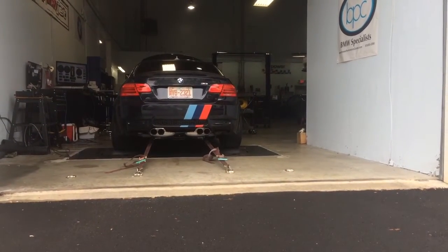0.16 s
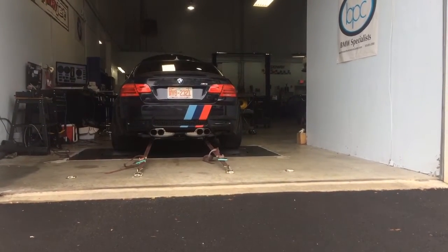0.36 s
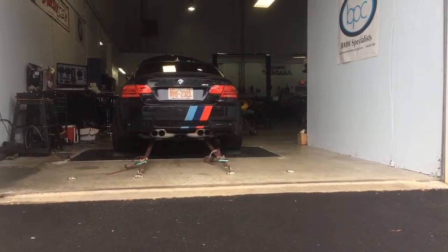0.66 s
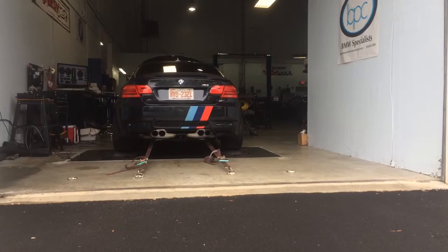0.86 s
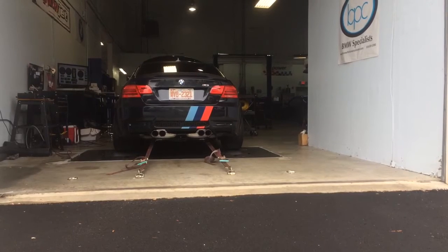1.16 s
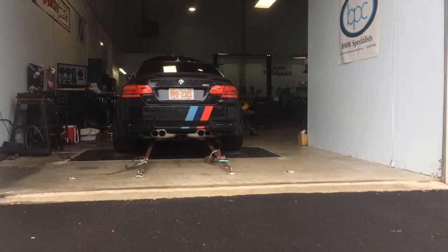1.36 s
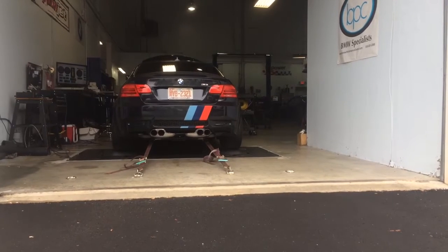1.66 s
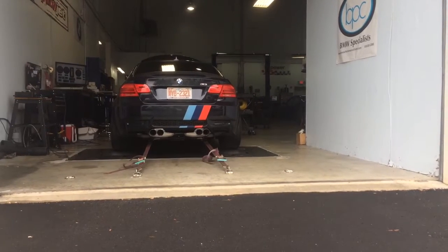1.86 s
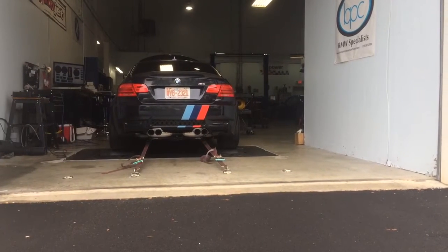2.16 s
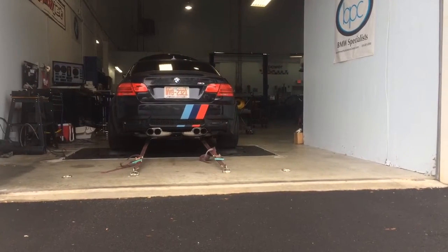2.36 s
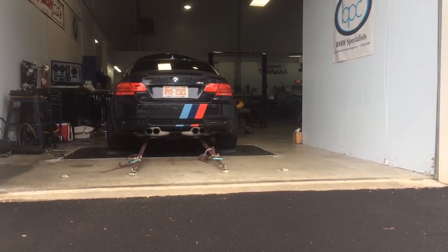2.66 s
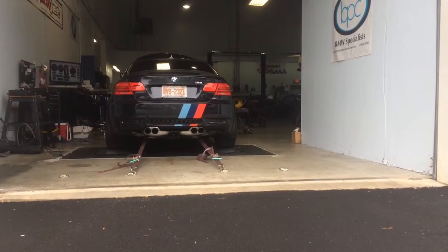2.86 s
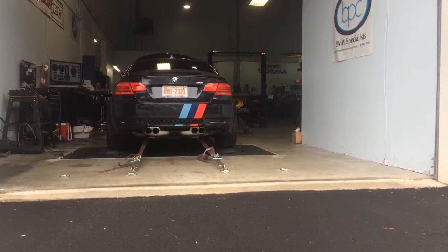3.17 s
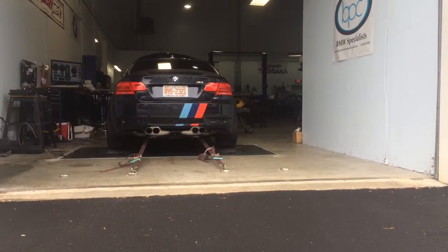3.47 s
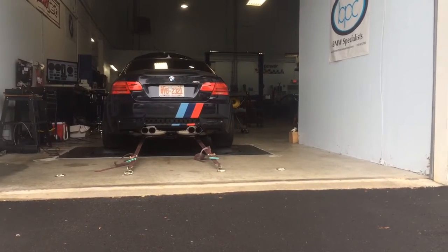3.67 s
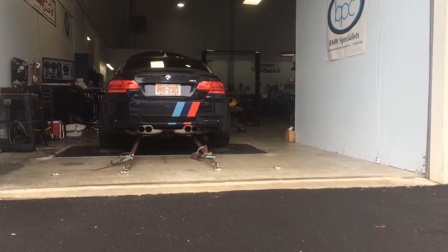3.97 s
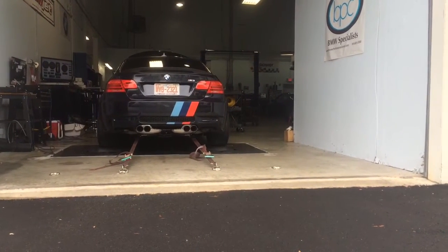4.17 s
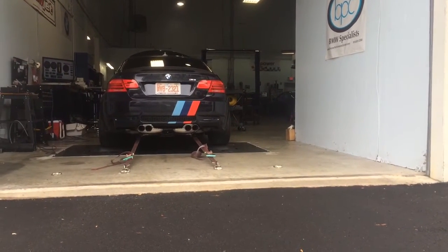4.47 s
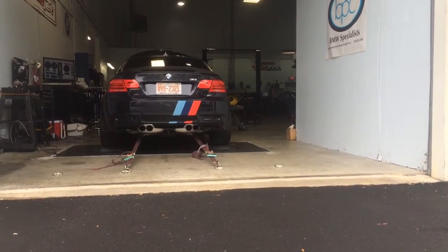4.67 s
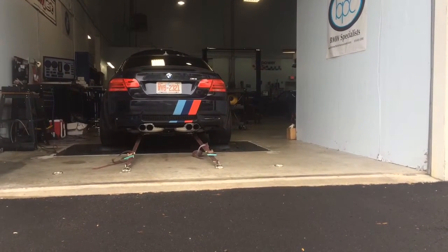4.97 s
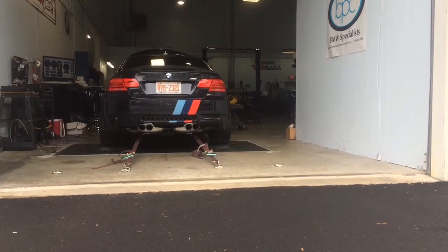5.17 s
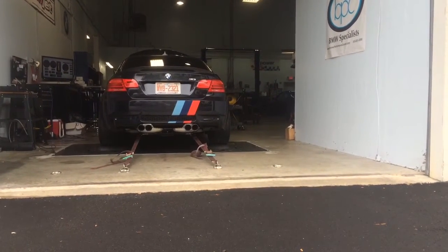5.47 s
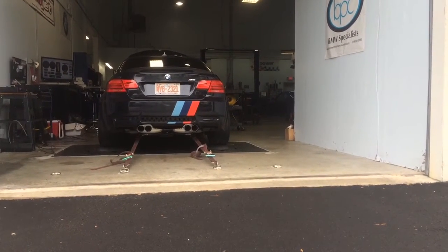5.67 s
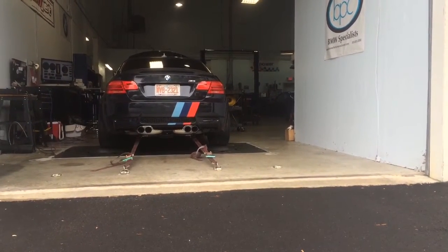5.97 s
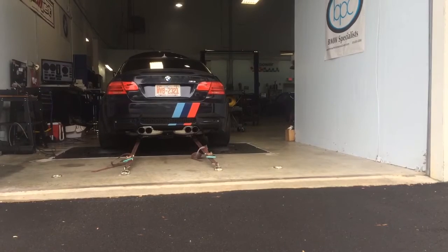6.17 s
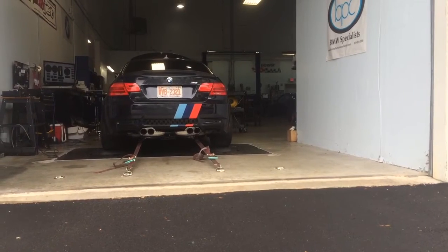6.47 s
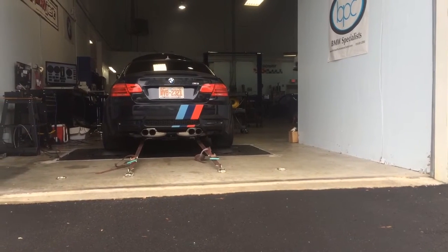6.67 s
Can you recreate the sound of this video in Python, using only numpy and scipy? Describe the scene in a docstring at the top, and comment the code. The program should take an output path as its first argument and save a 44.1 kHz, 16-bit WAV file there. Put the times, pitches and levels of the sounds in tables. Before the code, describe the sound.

A single microphone faces the exhaust at a garage doorway. The V8 barks briefly, lifts off and coasts in gear with a smooth falling hum, while shrill roller whines, broad tyre and fan hiss and low rumble dominate. After a short lull at five seconds the engine opens fully, its deep boom and coarse bark suddenly swamping everything, rising steadily in pitch until cut off, with short workshop reflections.

```python
"""An exhaust booms and barks at part throttle for a third of a second, then the throttle shuts.
A V8 car strapped to a roller dynamometer in an open workshop coasts down in gear, then takes full throttle.
Crank orders make the boom; uneven firing pulses and gas noise ring the pipes for the bark.
Two beating roller whines, tread bands and tyre hums ride over a hiss of tyres and fans and a low rumble.
The roller sounds and hiss sink at 5.21 s, as the exhaust gets loud."""
import sys
import numpy as np
from scipy import signal
from scipy.fft import rfft, irfft, next_fast_len
from scipy.io import wavfile
from scipy.ndimage import uniform_filter1d, map_coordinates

SR = 44100
rng = np.random.default_rng(int(sys.argv[2]) if len(sys.argv) > 2 else 0)


def file_out(sig):
    """Save sig as 16-bit WAV at sys.argv[1]."""
    # one column per channel
    cols = np.atleast_2d(sig).T
    # limit, then scale
    lim = np.clip(cols, -1, 1)
    pcm = np.round(lim * 32767).astype(np.int16)
    wavfile.write(sys.argv[1], SR, pcm)


N = 300762

# Boom levels. Each row: time in seconds, firing boom in dB, three-per-turn boom in dB before its wobble.
BOOM_LEVELS = [(0, -19, -32), (.2, -17.5, -23), (.36, -22.5, -28), (.43, -21.5, -16), (.52, -15.5, -18),
               (1.37, -15.5, -22), (2.27, -16, -23.5), (2.45, -14.5, -22.5), (3.5, -17.5, -20.5),
               (4.25, -16, -21.5), (4.7, -17.5, -21.5), (4.95, -27, -23.5), (5.05, -20, -21.5),
               (5.19, -8.5, -23.5), (5.26, -11, -22), (5.33, -11.5, -40), (5.4, -10.5, -37),
               (5.5, -12, -46), (5.61, -10, -38), (5.68, -13.5, -23), (5.76, -9.6, -38), (5.96, -8, -30),
               (6.38, -8.4, -27), (6.52, -9.5, -34), (6.82, -10.5, -25)]
# Colour the pipes give the twice-firing boom. Each row: frequency in Hz, gain in dB.
DOUBLE_FIRING_COLOUR = [(235, 4.5), (253, 5), (268, -1.5), (296, -7), (312, 2.5), (335, -14)]
# Weak crank orders. Each row: cycles per crank turn, level in dB before the standing waves, fading 0-1.
WEAK_ORDERS = [(1.5, -49, 0.6), (2, -38.5, 1), (2.5, -38.5, 1), (3.5, -38, 0.9), (4.5, -42.5, 1),
               (5, -34.5, 0), (5.5, -42.5, 0.53), (6, -36.5, 0.03), (6.5, -36, 0), (7, -30, 0.31)]
# Standing waves that lift and cancel the weak orders. Each row: frequency in Hz, gain in dB.
STANDING_WAVES = [(40, -1.5), (146, 3), (158, -3), (172, -1.5), (190, 0), (208, -3), (224, -9.5),
                  (260, -32)]


def boom(turns):
    """The low crank orders leave the silencers as nearly pure tones locked to the crank."""
    speed = crank_speed()
    firing_db, third_db = curves(BOOM_LEVELS)
    third_db = third_db + 1.2 * wobble(5)
    double_db = by_load(shut_db=-50, open_db=-31.5, per_turn_db=0.01)
    double_db = double_db + along(DOUBLE_FIRING_COLOUR, 8 * speed)

    tones = amp(firing_db) * narrow(4 * turns, fading=0.004, rate=14)
    tones += amp(third_db) * narrow(3 * turns, fading=0.008, rate=9)
    tones += amp(double_db) * narrow(8 * turns + 0.28, fading=0.065, rate=8.2)
    for order, db, fading in WEAK_ORDERS:
        order_db = db + along(STANDING_WAVES, order * speed)
        tones += amp(order_db) * narrow(order * turns + rng.random(), fading, rate=6)
    return tones


# Pulse strength in firing sequence. Each entry: level in dB at unevenness 1.
CYLINDER_DB = [0, -1, 0, -6, -.5, -1.5, 0, -4.5]
# Pulse lead on the boom. Each row: crank turns per second, lead in firings.
PULSE_LEAD = [(35, -.03), (40, .1)]


def firing_pulses(firing):
    """Each firing gives one pulse whose strength varies by cylinder and by chance."""
    uneven = throttle_and_unevenness()[1]
    at = np.flatnonzero(np.diff(np.floor(firing)) > 0)
    chance = rng.standard_normal((len(at), 2))
    jitter_s = 0.00013 * chance[:, 0]
    jitter = np.round(jitter_s * SR).astype(int)
    strength_db = uneven[at] * np.resize(CYLINDER_DB, len(at)) + 1.9 * chance[:, 1]
    pulses = np.zeros(N)
    pulses[np.clip(at + jitter, 0, N - 1)] = amp(strength_db)
    return pulses


# Tip resonances. Each row: frequency in Hz, width in Hz, relative level in dB.
TIP_MODES = [(900, 65, 9), (1320, 220, 2), (1605, 230, 0), (1960, 850, -10.5)]


def tip_rasp(pulses, firing):
    """Pulses and the turbulence that follows each firing ring the exhaust tips."""
    puff = 0.098 + np.exp(-6 * (firing % 1))
    turbulence = puff * rng.standard_normal(N)
    return 0.58 * steady(resonant(pulses, TIP_MODES)) + 0.57 * steady(resonant(turbulence, TIP_MODES))


# Gas rush levels. Each row: time in seconds, silencers in dB, tail pipes in dB.
RUSH_LEVELS = [(0, -32, -34), (.6, -36, -34), (2, -37.5, -38.5), (3, -35, -44), (4.8, -34.5, -47),
               (5.2, -32, -46), (5.7, -31, -37), (6.1, -40.5, -37), (6.82, -30.5, -26.5)]
# Silencer resonances. Each row: frequency in Hz, width in Hz, relative level in dB.
SILENCER_MODES = [(286.5, 35, 1), (378.3, 25.8, 3), (469, 112, -1.5)]
# Tail pipe resonances. Each row: frequency in Hz, width in Hz, relative level in dB.
TAIL_PIPE_MODES = [(568.5, 45, -0.5), (624.5, 54, 2), (985, 63, -5), (1511, 35, -10.5)]


def gas_rush(turns):
    """Flow noise, swelling and pumped once a turn, rings the silencers and tail pipes."""
    silencer_db, tail_db = curves(RUSH_LEVELS)
    pumping = np.diff(np.floor(turns), prepend=0) * amp(0.57 * wobble(18))
    throb = 1 + 0.07 * np.cos(2 * np.pi * turns)
    flow = throb * rng.standard_normal((2, N)) + 0.5 * unit(pumping)
    silencers = amp(silencer_db) * unit(resonant(flow[0], SILENCER_MODES))
    tails = amp(tail_db) * unit(resonant(flow[1], TAIL_PIPE_MODES))
    return silencers + tails


# Exhaust pipe resonances. Each row: frequency in Hz, width in Hz, relative level in dB.
PIPE_MODES = [(379, 28, -2), (517, 90, -3), (619.6, 60, 2), (808, 100, -8), (970, 270, -21)]
# Pipe tuning at wide throttle. Each row: crank turns per second, gain in dB.
WIDE_OPEN_TUNING = [(30, -1), (31.6, 2.5), (33, 1), (37.5, -0.5), (39.5, 2.5), (41.7, 6)]
# Rasp at wide throttle. Each row: crank turns per second, level in dB.
WIDE_OPEN_RASP = [(31, -60), (32.5, -45), (33.4, -36.5), (35, -31.5), (38, -29), (41.7, -27)]
RASP_SHUT_DB, SHOP_DB = -46.5, -15


def bark(turns):
    """Four firings a turn ring pipes and tips, echo in the workshop and drive a gas rush."""
    speed = crank_speed()
    wide = np.clip(throttle_and_unevenness()[0], 0, 1) ** 4
    burn_db = by_load(shut_db=-48, open_db=-22, per_turn_db=0.045)
    burn_db = burn_db + wide * np.interp(speed, *np.transpose(WIDE_OPEN_TUNING))
    rasp_open_db = np.interp(speed, *np.transpose(WIDE_OPEN_RASP))
    rasp_db = RASP_SHUT_DB + wide * (rasp_open_db - RASP_SHUT_DB)

    firing = 4 * turns + np.interp(speed, *np.transpose(PULSE_LEAD))
    pulses = firing_pulses(firing)
    burn = amp(burn_db) * unit(resonant(pulses, PIPE_MODES))
    direct = burn + amp(rasp_db) * tip_rasp(pulses, firing)
    return direct + amp(SHOP_DB) * shop(direct) + gas_rush(turns)


# Workshop decay. Each row: frequency in Hz, time to fall 60 dB in seconds.
SHOP_DECAY = [(150, 0.41), (700, 0.21), (3000, 0.16), (10000, 0.21)]


def shop(x):
    """The workshop answers with a noise tail in which each frequency dies at its own speed."""
    hz, t, z = signal.stft(rng.standard_normal(SR // 2), SR, nperseg=256)
    decay = amp(-60 * t / along(SHOP_DECAY, hz)[:, None])
    tail = signal.istft(z * decay, SR, nperseg=256)[1]
    delayed = np.pad(x, (500, 0))  # 500 samples
    return signal.fftconvolve(delayed, tail / np.linalg.norm(tail))[:N]


# Crank speed. Each row: time in seconds, crank turns per second.
CRANK_SPEED = [(0, 39.35), (.3, 38.6), (.6, 38.05), (1, 37.28), (4.6, 29.18), (4.9, 28.7), (5.05, 28.85),
               (5.12, 29.15), (5.26, 30.85), (5.33, 30.95), (5.4, 31.45), (5.58, 31.8), (5.68, 31.5),
               (5.75, 32.8), (5.82, 33.26), (5.96, 34.05), (6.08, 35.12), (6.44, 38.02), (6.82, 41.66)]


def crank_speed():
    """Crank turns per second fall on the overrun and climb under throttle."""
    return curves(CRANK_SPEED)[0]


# Driver's pedal. Each row: time in seconds, throttle 0-1, unevenness of the cylinders 0-2.
THROTTLE_MOVES = [(0, 0.57, 0.45), (.2, 0.7, .3), (.31, 0.61, .4), (.38, .01, 1.4), (5, 0, 1.2),
                  (5.14, 0.5, .6), (5.23, 0.9, 0.46), (5.32, 0.98, 0.92), (5.75, 0.96, 1.1),
                  (6.2, .99, 1.7), (6.82, 0.98, 0.56)]


def throttle_and_unevenness():
    """Throttle opening and the spread of cylinder strengths over time."""
    return curves(THROTTLE_MOVES)


REFERENCE_TURNS_PER_S = 35


def by_load(shut_db, open_db, per_turn_db):
    """Level in dB rises with throttle and by per_turn_db for each extra crank turn per second."""
    throttle = np.clip(throttle_and_unevenness()[0], 0, 1)
    return shut_db + (open_db - shut_db) * throttle + per_turn_db * (crank_speed() - REFERENCE_TURNS_PER_S)


# Roller speed as pitch. Each row: time in seconds, roller whine in Hz.
ROLLER_PITCH = [(0, 2404), (.25, 2399), (.55, 2375), (1.05, 2306), (2.45, 2107), (4.35, 1843), (4.65, 1797),
                (4.85, 1778), (5.1, 1782), (5.25, 1808), (5.45, 1876), (5.75, 1992), (6.05, 2125),
                (6.45, 2316), (6.82, 2522)]
REFERENCE_HZ = 2100  # roller whine at which the laws below hold
# Each law: level in dB, growth as a power of roller speed, dB lost at a sink of 1.
WHINE_LAW, TREAD_LAW, HISS_LAW = (-43, 0.75, 15.2), (-38.5, 2.3, 11.4), (-35.5, 2.4, 8.9)
SINK_S, SINK_TAKES_S, FLUTTER_DB = 5.21, 0.07, 1.8
DEEPER_SHARE, RETURN_S = 0.23, 0.27  # extra sink at first, and its decay time
LIFT_S, LIFT_SPREAD_S, LIFT_DB = 5.04, 0.19, 3.5  # hiss and tread rise while the boom is faint


def rollers():
    """Whine, tread, hiss and hum follow roller speed, then sink and flutter under the bark."""
    t = np.arange(N) / SR
    whine_hz = curves(ROLLER_PITCH)[0]
    turns = np.cumsum(whine_hz) / SR  # cycles of the whine
    extra = DEEPER_SHARE * np.exp(-np.abs(t - SINK_S) / RETURN_S)
    sunk = np.clip((t - SINK_S) / SINK_TAKES_S, 0, 1) * (1 + extra)
    lift_db = LIFT_DB * np.exp(-((t - LIFT_S) / LIFT_SPREAD_S) ** 2)
    flutter_db = FLUTTER_DB * sunk * wobble(35)
    speed_db = 20 * np.log10(whine_hz / REFERENCE_HZ)

    def level_db(law):
        """Level grows with roller speed and falls with the sink."""
        db, power, loss_db = law
        return db + power * speed_db - loss_db * sunk + flutter_db

    whine = amp(level_db(WHINE_LAW)) * wheel_whine(turns, sunk)
    tread = amp(level_db(TREAD_LAW) + lift_db) * tread_bands(turns)
    hiss = air_hiss(level_db(HISS_LAW) + lift_db)
    return whine + tread + tyre_hum(turns, sunk) + hiss


# Whine lines. Each row: multiple of the whine, relative level in dB before sparing, second wheel 0-1.
WHINE_LINES = [(1, .5, .7), (2, 7, .65), (3, -12, .6), (4, -1.5, .4), (5, -14, .5), (6, -22, .6)]
SPARED_DB = 1.24  # sink spared per multiple, up to the fourth


def wheel_whine(turns, sunk):
    """Two wheels turn at slightly different speeds, so their whines beat."""
    ahead = 0.0021 * turns + 0.08 * wobble(6)
    lines = np.zeros(N)
    for k, db, second in WHINE_LINES:
        line_db = db + SPARED_DB * sunk * min(k, 4)
        first_wheel = narrow(k * (turns + ahead), fading=0.3, rate=10)
        second_wheel = second * narrow(k * (turns - ahead), fading=0.3, rate=20)
        lines += amp(line_db) * (first_wheel + second_wheel) / np.hypot(1, second)
    return lines


# Tread bands. Each row: multiple of the whine, width in Hz as drift rate, relative level in dB.
TREAD_BANDS = [(1.75, 303.4, -5), (2.188, 253.2, -9)]


def tread_bands(turns):
    """Fast random drift broadens lines on the roller phase into noisy bands."""
    return sum(amp(db) * narrow(k * turns, 0.98, width_hz) for k, width_hz, db in TREAD_BANDS)


# Resonance that carries the hums. Each row: frequency in Hz, width in Hz, gain in dB.
HUM_MODES = [(383, 16.6, 2)]
HUM_SHARES, HUM_DB = (0.156, 0.1597), -40  # shares of the whine pitch; level before resonance and sink


def tyre_hum(turns, sunk):
    """Two close tyre hums beat through one resonance."""
    hums = sum(narrow(share * turns, fading=0.05, rate=3.45) for share in HUM_SHARES)
    return amp(HUM_DB - HISS_LAW[2] * sunk) * resonant(hums, HUM_MODES)


# Hiss spectrum. Each row: frequency in Hz, relative density in dB per Hz.
AIR_SPECTRUM = [(880, -26), (1500, -2), (1800, -1.5), (2710, -3.5), (3720, -0.5), (5380, -2.5),
                (6340, -6.5), (7470, -5), (11200, -9), (15100, -16.5)]


def air_hiss(level_db):
    """Tyres and fans give shaped noise with a random flicker in level."""
    flicker_db = 0.5 * wobble(16) + 0.6 * wobble(45)
    return amp(level_db + flicker_db) * shaped_noise(AIR_SPECTRUM)


# Rumble level. Each row: time in seconds, level in dB before its wobble.
RUMBLE_LEVEL = [(0, -44), (.36, -44), (.52, -30), (1.3, -41), (1.9, -36), (2.6, -33), (3.2, -33),
                (3.45, -32), (4.3, -27.5), (4.85, -38), (5.19, -25), (5.53, -37), (6.12, -27), (6.5, -35),
                (6.82, -36)]
# Rumble spectrum. Each row: frequency in Hz, relative density in dB per Hz.
RUMBLE_SPECTRUM = [(15, -12), (30, -4), (50, 0), (75, 0), (100, -5), (150, -10), (220, -14), (320, -30),
                   (500, -60)]


def low_rumble():
    """Low-frequency shaped noise swells and sinks on a set curve with a random wobble."""
    level_db = curves(RUMBLE_LEVEL)[0] + 1.2 * wobble(24)
    return amp(level_db) * shaped_noise(RUMBLE_SPECTRUM)


def shaped_noise(spectrum):
    """White noise shaped to a spectrum, at rms 1."""
    return unit(filtered(rng.standard_normal(N), lambda hz: amp(along(spectrum, hz))))


def amp(db):
    """Amplitude factor from dB."""
    return 10 ** (np.asarray(db) / 20)


def unit(x):
    """x scaled to an rms of 1."""
    return x / np.sqrt(np.mean(x ** 2) + 1e-20)


def steady(x):
    """x at a running rms of 1 over a quarter second."""
    return x / np.sqrt(np.abs(uniform_filter1d(x * x, size=SR // 4)) + 1e-12)


def along(points, hz):
    """(Hz, value) points interpolated on a log axis."""
    f, v = np.transpose(points)
    return np.interp(np.log(hz + 1), np.log(f + 1), v)


def curves(rows):
    """One value per sample for each column after the time."""
    s, *cols = np.transpose(rows)
    return [np.interp(np.arange(N) / SR, s, c) for c in cols]


def wobble(rate):
    """A smooth random curve of about rms 1, rate knots per second."""
    coarse = np.arange(0, N + 16, 16)
    knots = rng.standard_normal(int(N * rate / SR) + 4)
    smooth = map_coordinates(knots, [coarse * rate / SR])
    return np.interp(np.arange(N), coarse, unit(smooth))


def narrow(turns, fading, rate):
    """A line of about rms 1 on a phase in turns: a steady part plus a part that fades and drifts."""
    fading = np.clip(fading, 0, 1)
    drift = (wobble(rate) + 1j * wobble(rate)) / np.sqrt(2)
    envelope = np.sqrt(1 - fading) + np.sqrt(fading) * drift
    return np.sqrt(2) * np.real(envelope * np.exp(2j * np.pi * turns))


def filtered(x, response):
    """x times a complex response of frequency."""
    m = next_fast_len(N + SR // 2)
    return irfft(rfft(x, m) * response(np.fft.rfftfreq(m, 1 / SR)), m)[..., :N]


def resonant(x, modes):
    """x through parallel causal resonances of alternating sign."""
    def response(f):
        """Sum of second-order band-pass modes."""
        total = 0
        for k, (center_hz, width_hz, db) in enumerate(modes):
            damping = 1j * f * width_hz
            total = total + (-1) ** k * amp(db) * damping / (center_hz ** 2 - f * f + damping)
        return total
    return filtered(x, response)


def scene():
    """Exhaust, rollers and rumble summed to one channel."""
    turns = np.cumsum(crank_speed()) / SR
    return (boom(turns) + bark(turns) + rollers() + low_rumble())[None]


TOP_HZ = 15300


def record(dry):
    """Peaks are squeezed softly, then nothing is kept above the band limit."""
    ceiling = 0.75
    squeezed = dry / (1 + np.abs(dry / ceiling) ** 8) ** (1 / 8)
    return filtered(squeezed, lambda hz: hz < TOP_HZ)


dry = scene()
out = record(dry)
file_out(out)
```